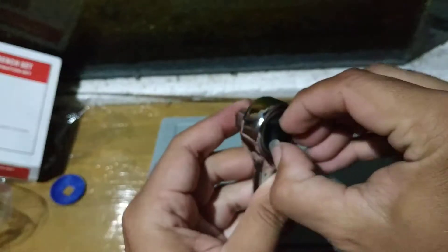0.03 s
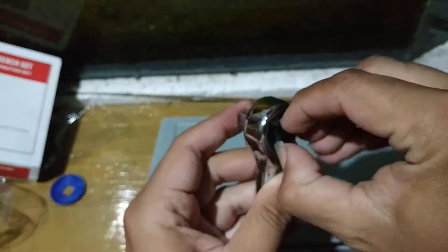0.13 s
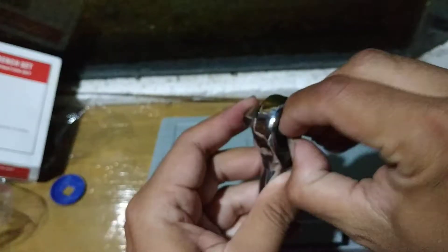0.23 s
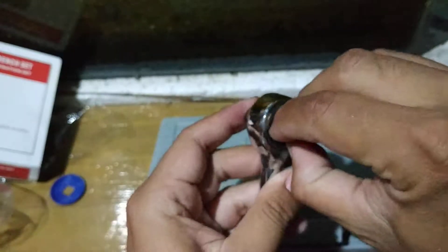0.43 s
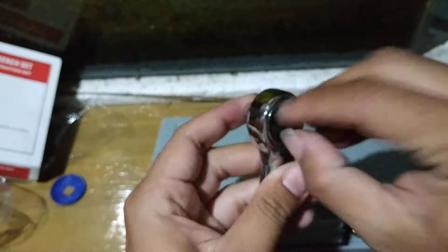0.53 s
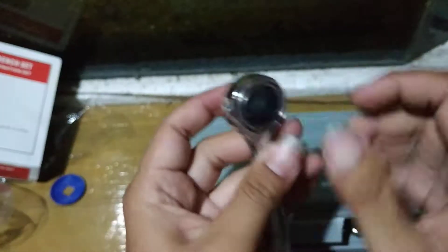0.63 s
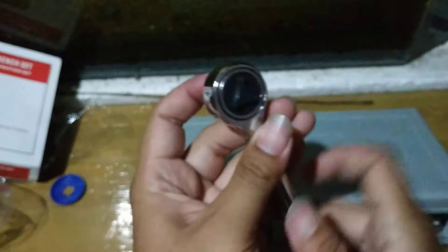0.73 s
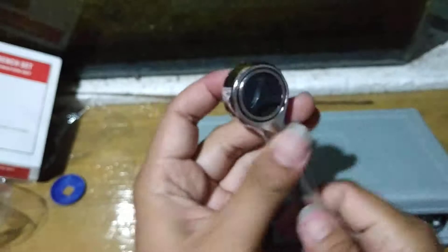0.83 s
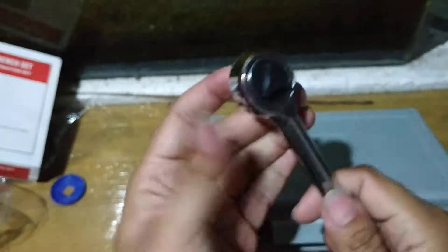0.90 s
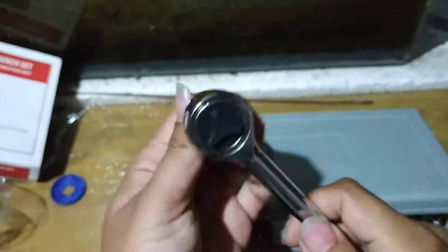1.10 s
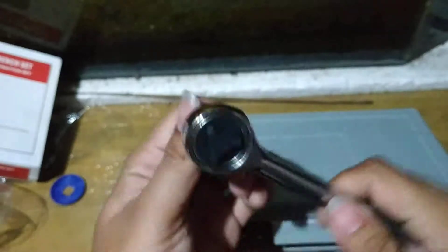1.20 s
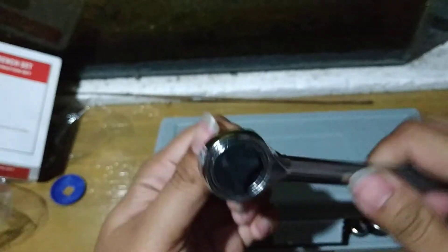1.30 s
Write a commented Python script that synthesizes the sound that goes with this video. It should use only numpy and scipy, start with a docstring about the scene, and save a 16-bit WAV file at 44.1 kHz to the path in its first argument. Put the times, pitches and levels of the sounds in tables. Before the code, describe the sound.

A steel socket wrench clinks close by in a small room. At about 0.2 seconds the socket rattles and snaps on with a short bright ring, the loudest moment. Faint ticks and finger brushes follow from 0.55 seconds, then a soft palm bump and a slide with a faint, thin, high squeak near 1 second. The head clinks at 1.1 and the ratchet ticks at 1.2, over a faint hum.

```python
"""A steel socket wrench is handled close by, over a wooden table in a small room.
First the socket rattles and snaps home on the drive (0.22 s), each contact a click and a short ring.
From 0.55 s fingers brush the tool and the pawl ticks faintly; the tool bumps the palm, then slides
through it with a thin gliding squeak. The handle swings: the ratchet head clinks (1.08 s) and the
pawl ticks again (1.19 s). Low room noise and a faint hum lie underneath throughout."""
import sys
import numpy as np
from scipy import signal
from scipy.fft import rfft, irfft, next_fast_len
from scipy.io import wavfile
from scipy.ndimage import map_coordinates

SR = 44100
rng = np.random.default_rng(int(sys.argv[2]) if len(sys.argv) > 2 else 0)


def persist_wave(psi):
    """Save psi, clipped to +-1, as 16-bit WAV."""
    counts = np.round(np.clip(psi, -1, 1) * 32767).astype(np.int16)
    wavfile.write(sys.argv[1], SR, np.atleast_2d(counts).T)


N = 59535
TIME_S = np.arange(N) / SR

# socket contacts (time [s], relative level [dB], bass [dB], treble [dB], ring [dB],
#                  free ringing [s], click t60 [s], left over right [dB])
SOCKET_CONTACTS = [(.2205, -34, 11, 2, -12, 0.0021, .04, -2),
                   (.2243, -17.5, -4, 5, -6.5, 0.0027, 0.0095, 0),
                   (.2272, -36.5, 12.5, 0, 5, 0.0032, .014, -10),
                   (.2314, -20, -2.5, 0, -4, 0.0033, 0.018, -3),
                   (.2374, -14.5, -3, -6, -6, 0.0053, 0.0074, 0.5),
                   (.2386, -16, -24, 8.5, -8, 0.0016, 0.0046, 1),
                   (.2512, -27, -43, 2, 8.5, 0.0064, 0.012, -2.5), (.272, -38, -21, 5, 4, 0.0058, .03, 2),
                   (.2785, -45.5, 13, 6, 3, 0.023, 0.018, 0), (.398, -55.5, 11.5, 0, -6, 0.0064, 0.077, 1)]
# socket modes (frequency [Hz], gain [dB], t60 [s])
SOCKET_RING = [(1760, -15, .04), (4470, -13, .11), (4700, -21, .1), (5000, -25, .1), (8265, -11, .27),
               (8435, -14, .2), (9665, -20, .13), (10035, -6, .19), (10125, -4, .13), (10270, -13, .16),
               (10483, -17, .15), (11140, -18, .15), (12740, -12, .17), (13050, -13, .13)]
# socket click spectrum (frequency [Hz], gain [dB])
SOCKET_SPECTRUM = [(60, -60), (250, -32), (900, -18), (1300, -22), (1800, -10.5), (2400, -18),
                   (3600, -13.5), (4500, -2), (5400, -11), (7200, -11.5), (8400, 2), (9100, -7.5),
                   (10200, -2), (11600, 0), (12200, -2.5), (13000, -4.5), (14300, -17), (16000, -18)]
def socket():
    """The socket rattles against the drive and snaps home."""
    return clinks(SOCKET_CONTACTS, SOCKET_RING, SOCKET_SPECTRUM)


# head contacts (columns as SOCKET_CONTACTS)
HEAD_CONTACTS = [(1.078, -33.5, 4, -1, 5.1, 0.00063, 0.0068, 18),
                 (1.0795, -23, -17, 6.5, 7.4, 0.0046, .022, -3.5),
                 (1.0822, -23, 3.5, 4, 1, 0.012, .016, -2.5), (1.0868, -35, -14, 1, 10.6, 0.0051, .02, 10)]
# head modes (frequency [Hz], gain [dB], t60 [s])
HEAD_RING = [(1900, -16, .03), (4700, -15, .13), (4810, -6, .08), (5670, -19, .1), (6918, -14, .1),
             (8220, -5, .21), (8300, -15, .15), (10112, -7, .05), (12640, -14, .06), (13040, -17, .06)]
# head click spectrum (frequency [Hz], gain [dB])
HEAD_SPECTRUM = [(30, -35), (200, -27), (1300, -30), (1950, -1.5), (2600, -23), (3300, -9), (4100, -15),
                 (4800, 4.5), (5400, -3), (6500, -4.5), (7400, -19), (8300, 2.5), (9200, -5.5), (10200, 1),
                 (11500, -9.5), (12800, -2.5), (14300, -4.5), (16000, -20)]
def ratchet_head():
    """Four contacts merge into one clink as the handle swings."""
    return clinks(HEAD_CONTACTS, HEAD_RING, HEAD_SPECTRUM)


# pawl contacts (columns as SOCKET_CONTACTS)
PAWL_CONTACTS = [(.581, -42.5, -8, -1.5, -1.5, 0.011, 0.024, -3),
                 (.732, -48, -2.5, -3, 1.5, .01, 0.018, -2), (1.1805, -50, 11, -6, 2, 0.0052, .015, 2),
                 (1.1918, -23.5, 4.5, -14, -12, 0.0039, .006, -1.5),
                 (1.1942, -36.5, 1.5, 2.5, 3, 0.0053, 0.021, -1)]
# pawl modes (frequency [Hz], gain [dB], t60 [s])
PAWL_RING = [(2100, -16, .025), (5350, -13, .05), (6450, -17, .03), (8270, -4, .09), (8410, -2, .09),
             (10400, -13, .04), (12750, -6, .07)]
# pawl click spectrum (frequency [Hz], gain [dB])
PAWL_SPECTRUM = [(300, -42), (1300, -31), (2100, 0.5), (2800, -14), (4200, -2.5), (5300, 3), (5800, -12),
                 (6450, 5), (7400, -16), (8400, 7.5), (9200, -3), (10400, 2.5), (11700, -6), (12800, 7),
                 (14500, -10), (16000, -28)]
def pawl():
    """The pawl ticks; its modes die quickly."""
    return clinks(PAWL_CONTACTS, PAWL_RING, PAWL_SPECTRUM)


# stereo likeness of the steel (frequency [Hz], left-right correlation [-1..1])
STEEL_CORRELATION = [(2000, .85), (4700, .5), (5700, -.1), (7000, .6), (8300, -.85), (10100, .75),
                     (11500, -.1), (12700, .4)]
def clinks(contacts, modes, spectrum):
    """Faces chatter on contact; the part rings freely, then more faintly once the parts press together."""
    bass_edge_hz, treble_edge_hz = 6700, 10700
    attack_s, contact_s = .00021, .001
    chatter_db, scatter_db, clamp_db = 1.3, 2.5, -9.5
    spread_rad, rough_rad = .35, .35
    out, t = np.zeros((2, 2 * N)), TIME_S[:SR // 3]
    for start_s, db, bass_db, treble_db, ring_db, free_s, click_t60_s, pan_db in contacts:
        def shelves(hz):
            low_db = bass_db / (1 + (hz / bass_edge_hz) ** 8)
            high_db = treble_db / (1 + (treble_edge_hz / (hz + 1)) ** 24)
            return amp(low_db + high_db)
        chatter = unit(amp(chatter_db * wobble(1500, t)))
        burst = filtered(noise(spectrum, STEEL_CORRELATION), shelves)[:, :len(t)]
        click = burst * chatter * fade(np.maximum(t - contact_s, 0), click_t60_s)
        ring = 0
        for hz, mode_db, t60_s in modes:
            stereo_rad = np.arccos(along(STEEL_CORRELATION, hz)) * np.array([[.5], [-.5]])
            phase = 2 * np.pi * rng.random() + stereo_rad + spread_rad * rng.standard_normal((2, 1))
            phase = phase + rough_rad * wobble(150, t)
            gain = shelves(hz) * amp(ring_db + mode_db + scatter_db * rng.standard_normal((2, 1)))
            ring = ring + gain * np.sin(2 * np.pi * hz * t + phase) * fade(t, t60_s)
        clamp = amp(clamp_db * (1 - 1 / (1 + (t / free_s) ** 8)))
        attack = 1 - np.exp(-t / attack_s)
        start = round(start_s * SR)
        out[:, start:start + len(t)] += amp(db) * pan(pan_db) * (click + ring * clamp) * attack
    return out[:, :N]


# radiation of the steel (frequency [Hz], left over right [dB])
STEEL_BALANCE = [(2000, 2), (5000, -2), (8300, 2), (10500, 0), (13000, 9), (16000, 7)]
def wrench():
    """The three steel parts radiate unevenly to left and right."""
    steel = socket() + ratchet_head() + pawl()
    return filtered(steel, lambda hz: amp(np.outer([.5, -.5], along(STEEL_BALANCE, hz))))


# finger strokes (time [s], relative level [dB], rise [s], fall [s])
BRUSH_STROKES = [(.555, -58, .015, .02), (.823, -48.5, .009, .01), (.866, -53, .012, .01)]
# skin friction spectrum (frequency [Hz], gain [dB])
BRUSH_SPECTRUM = [(30, -30), (200, -17), (1200, -20), (2500, 7), (6000, 4.5), (10000, 7.5), (14000, 12),
                  (16000, -35)]
def finger_brushes():
    """Skin brushes the steel in short, bright hisses."""
    return strokes(BRUSH_STROKES, BRUSH_SPECTRUM, gain_db=4.5)


# bump on the palm (time [s], relative level [dB], rise [s], fall [s])
KNOCK_STROKES = [(.822, -45.5, .013, .025)]
# bump spectrum (frequency [Hz], gain [dB])
KNOCK_SPECTRUM = [(120, -45), (520, 0.5), (720, -1.5), (900, 7), (1080, 0), (1260, 6.5), (1520, -3),
                  (1800, 6), (2400, -2), (3300, 0), (6000, -6.5), (16000, -11)]
def palm_knock():
    """The tool bumps softly against the palm."""
    return strokes(KNOCK_STROKES, KNOCK_SPECTRUM, gain_db=3.5)


def strokes(rows, spectrum, gain_db):
    """Grainy friction noise swells and dies with each stroke."""
    envelope = sum(amp(db) * np.exp(-np.maximum((peak_s - TIME_S) / rise_s, (TIME_S - peak_s) / fall_s))
                   for peak_s, db, rise_s, fall_s in rows)
    grain = unit(amp(.82 * wobble(600)))
    return amp(gain_db) * envelope * grain * noise(spectrum)


# palm friction spectrum (frequency [Hz], gain [dB])
SLIDE_SPECTRUM = [(30, -45), (120, -36), (450, 3.5), (800, -9.5), (1150, 1), (1700, -11), (3000, -13.5),
                  (7000, -29), (16000, -20.5)]
def palm_slide(peak_s=.95, sigma_s=.17, peak_db=-53):
    """The handle slides through the palm: one swell of dull noise."""
    swell = np.exp(-.5 * ((TIME_S - peak_s) / sigma_s) ** 2)
    return amp(peak_db) * swell * noise(SLIDE_SPECTRUM)


# squeak glide (time [s], upper pitch [Hz], relative level [dB], lower pitch [Hz], relative level [dB])
SQUEAK_GLIDE = [(.905, 12200, -68, 10050, -85), (.96, 13180, -57, 10850, -56),
                (1.003, 13770, -51, 11200, -52), (1.05, 13560, -57, 10800, -57),
                (1.08, 13300, -68, 10450, -66)]
def squeak(gain_db=1.5, faint_db=-12, upper_pan_db=11, jitter_hz=60, flicker_db=3):
    """Two thin, unsteady tones rise and fall as the tool turns, with a fainter one above and below."""
    times_s, upper_hz, upper_db, lower_hz, lower_db = np.transpose(SQUEAK_GLIDE)
    def tone(hz, db):
        pitch_hz = np.interp(TIME_S, times_s, hz) + jitter_hz * wobble(750)
        flicker = amp(flicker_db * wobble(300))
        envelope = np.interp(TIME_S, times_s, amp(db), left=0, right=0)
        return envelope * unit(np.sin(2 * np.pi * np.cumsum(pitch_hz) / SR) * flicker)
    upper = tone(upper_hz, upper_db) + tone(1.05 * upper_hz, upper_db + faint_db)
    lower = tone(lower_hz, lower_db) + tone(.81 * lower_hz, lower_db + faint_db)
    return amp(gain_db) * (upper * pan(upper_pan_db) + lower)


# room decay (frequency [Hz], t60 [s])
ROOM_DECAY = [(300, 0.33), (4000, 0.23), (8000, 0.22), (12000, 0.23), (15000, 0.15)]
def reflections(x, early_db=-8, early_t60_s=.027, early_delay_s=.0015, tail_db=-12, tail_delay_s=.006):
    """Quick reflections from table and hands, then the short tail of the room."""
    hz, frame_s, bands = signal.stft(rng.standard_normal((2, SR // 3)), SR, nperseg=256)
    tail = signal.istft(bands * fade(frame_s, along(ROOM_DECAY, hz)[:, None]), SR, nperseg=256)[1]
    t = TIME_S[:tail.shape[1]]
    early = rng.standard_normal(tail.shape) * fade(t, early_t60_s) * (t > early_delay_s)
    response = amp(tail_db) * unit(tail * (t > tail_delay_s)) + amp(early_db) * unit(early)
    return signal.fftconvolve(x, response / np.sqrt(len(t)), axes=1)[:, :N]


# room noise spectrum (frequency [Hz], gain [dB])
ROOM_SPECTRUM = [(28, -44), (123, -17.5), (208, 2.5), (292, -4), (359, -4), (443, -7), (532, -5.5),
                 (591, -7), (673, -2), (945, -10.5), (1110, -10.5), (1550, -15), (2620, -14.5), (4420, -17),
                 (15500, -19)]
# hum tones (frequency [Hz], rms level [dB])
HUM_TONES = [(205, -71.5), (300, -67), (350, -68.5), (550, -67), (650, -70.5), (700, -71.5)]
def background(noise_db=-51):
    """Steady room noise with a faint wavering hum."""
    hum = sum(amp(db) * np.sqrt(2) * np.sin(2 * np.pi * hz * TIME_S + wobble(12.02))
              for hz, db in HUM_TONES)
    return amp(noise_db) * noise(ROOM_SPECTRUM) + hum


# stereo likeness of hand and room noise (frequency [Hz], left-right correlation [-1..1])
NOISE_CORRELATION = [(60, 0.95), (200, 0.87), (350, 0.54), (700, 0), (1400, 0.083), (3000, 0.12),
                     (10000, 0)]
def noise(spectrum, correlation=NOISE_CORRELATION):
    """Coloured stereo noise, rms 1."""
    def mid_side_gains(hz):
        angle = np.arccos(np.clip(along(correlation, hz), -1, 1)) / 2
        return amp(along(spectrum, hz)) * [np.cos(angle), np.sin(angle)]
    mid, side = filtered(rng.standard_normal((2, N)), mid_side_gains)
    return unit(np.array([mid + side, mid - side]))


def filtered(x, gain_at):
    """Zero-phase filter with gain_at(hz)."""
    size = next_fast_len(N + SR // 4)
    return irfft(rfft(x, size) * gain_at(np.fft.rfftfreq(size, 1 / SR)), size)[..., :N]


def wobble(rate_hz, t=TIME_S):
    """Smooth random curve, rms near 1."""
    return map_coordinates(rng.standard_normal(N // 32), [t * rate_hz], mode="wrap")


def along(points, hz):
    """Interpolate over log frequency."""
    knots_hz, values = np.transpose(points)
    return np.interp(np.log(hz + 1), np.log(knots_hz + 1), values)


def fade(t, t60_s):
    """Exponential decay."""
    return np.exp(-np.log(1000) * t / np.maximum(t60_s, 1e-4))


def pan(db):
    """Left and right gains."""
    return amp(np.array([[db], [-db]]) / 2)


def amp(db):
    """Decibels to gain."""
    return 10 ** (np.asarray(db) / 20)


def unit(x):
    """Scale to rms 1."""
    return x / np.sqrt(np.mean(x ** 2) + 1e-20)


def scene():
    """The wrench and its reflections, the hands, the room noise."""
    steel = wrench()
    echoes = reflections(steel)
    hands = palm_slide() + finger_brushes() + palm_knock()
    return steel + echoes + hands + squeak() + background()


def record(dry):
    """Steep low-pass."""
    cutoff_hz, edge_hz = 15900, 300
    return filtered(dry, lambda hz: np.clip((cutoff_hz - hz) / edge_hz + .5, 0, 1))


dry = scene()
out = record(dry)
persist_wave(out)
```